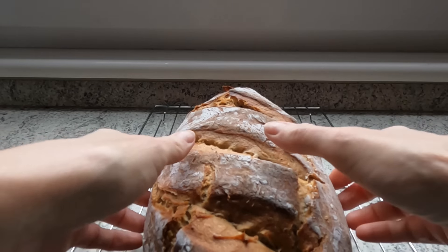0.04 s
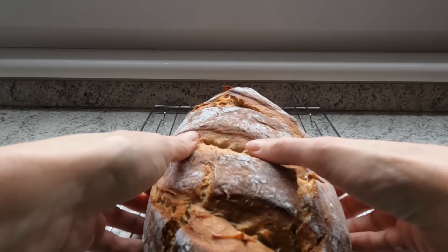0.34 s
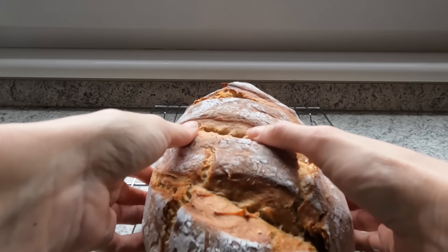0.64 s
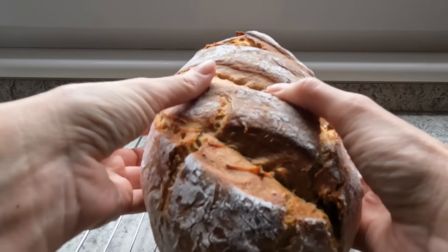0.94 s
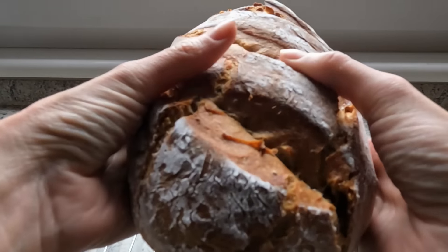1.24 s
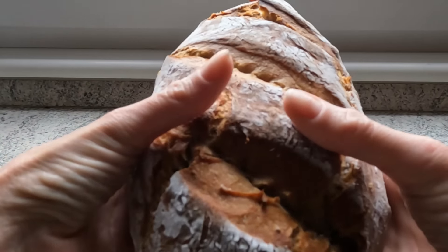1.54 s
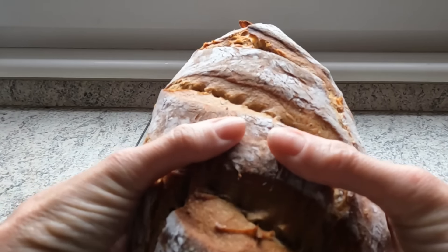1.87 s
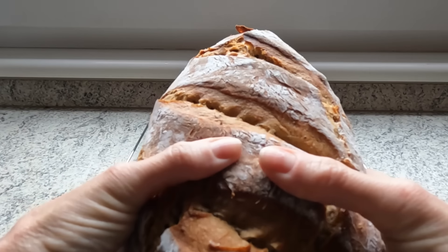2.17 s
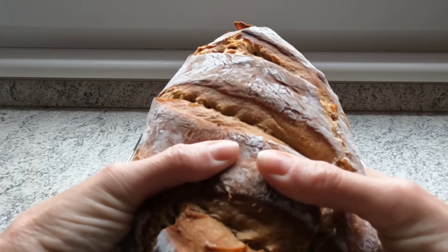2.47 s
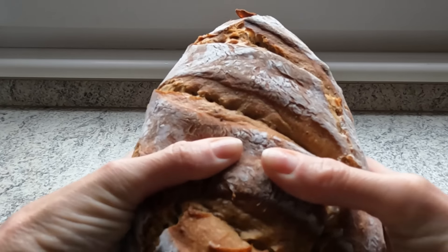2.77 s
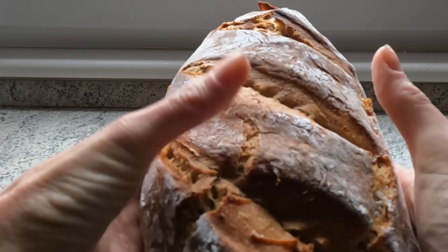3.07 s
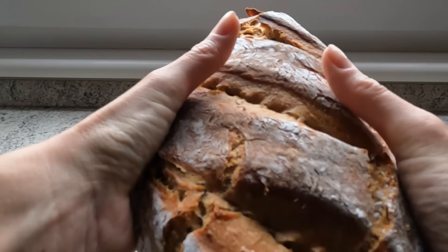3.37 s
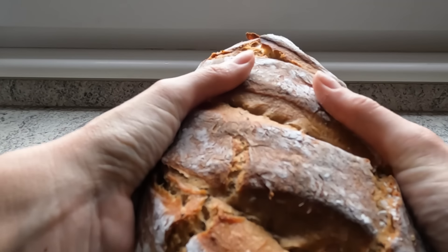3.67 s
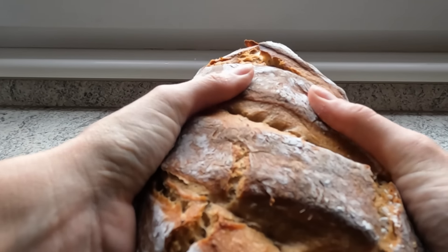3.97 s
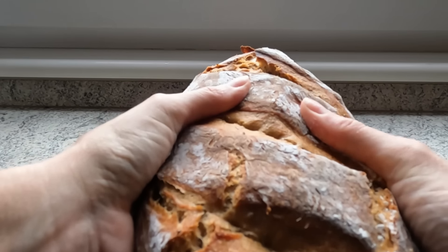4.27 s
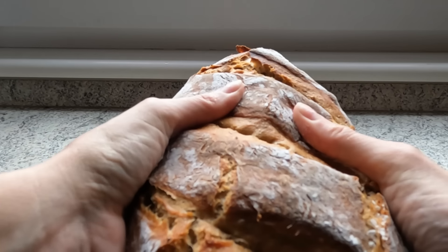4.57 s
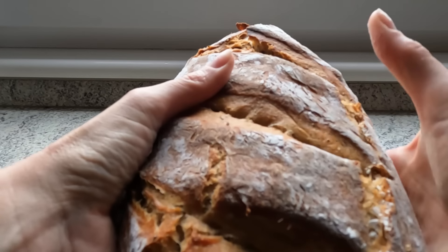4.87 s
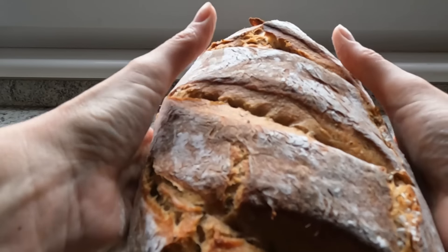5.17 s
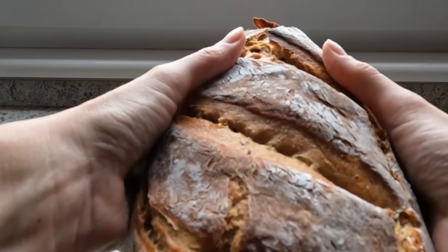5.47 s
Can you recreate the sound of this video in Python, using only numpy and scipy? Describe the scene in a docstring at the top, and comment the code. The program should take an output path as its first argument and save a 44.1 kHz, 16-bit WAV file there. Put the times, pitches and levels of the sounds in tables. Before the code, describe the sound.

Dry hands slide over a loaf of bread and lift it from a wire rack, which pings as the crust scrapes and the loaf thuds softly. Two squeezes follow, each breaking the crust into sharp clicks and fine crumbling, the first one longer. Between them comes a dull knock with a low rumble from the microphone stand. Everything is very near, in a small kitchen that hums quietly.

```python
"""The crust of a loaf snaps and crumbles as two hands squeeze it twice, close by in a small kitchen.
Each flake breaks with a click and splinters briefly; harder pressure sheds more and larger crumbs.
First the loaf is lifted off a wire cooling rack: the wires ping, the crust scrapes and judders.
Palms slide over the floury crust and the loaf thumps softly. Behind it, bumps set a camera stand
swaying with a low rumble, and the room hums quietly."""
import sys
import numpy as np
from scipy import signal
from scipy.fft import rfft, irfft
from scipy.io import wavfile

SR = 44100
rng = np.random.default_rng(int(sys.argv[2]) if len(sys.argv) > 2 else 0)


def wav_out(sig):
    """Save sig, one row per channel (or a flat mono array), as 16-bit PCM at SR to the path in sys.argv[1]."""
    wavfile.write(sys.argv[1], SR, np.round(np.clip(np.atleast_2d(sig).T, -1, 1) * 32767).astype(np.int16))


N = 243431
TIME = np.arange(N) / SR


def undb(db):
    """Decibels to gain."""
    return 10 ** (np.asarray(db) / 20)


def unit(x):
    """Scale to rms 1."""
    return x / np.sqrt(np.mean(x ** 2) + 1e-18)


def add(out, start_s, x):
    """Mix x into out from start_s on."""
    i = max(int(start_s * SR), 0)
    out[..., i:i + x.shape[-1]] += x[..., :max(N - i, 0)]


def place(x, pan_db):
    """Mono to stereo, left pan_db above right."""
    return x * undb(np.array([[pan_db], [-pan_db]]) / 2)


def colour(x, points, size=4096):
    """Minimum-phase filter through (freq_hz, gain_db) points, falling away outside them."""
    hz, db = np.transpose(points)
    log_hz = np.log(np.arange(size // 2 + 1) * SR / size + 1)
    outside = np.maximum(np.log(hz[0]) - log_hz, 0) + np.maximum(log_hz - np.log(hz[-1]), 0)
    gain_db = np.interp(log_hz, np.log(hz), db) - 20 * outside
    cepstrum = irfft(np.log(undb(gain_db)))
    cepstrum[1:size // 2] *= 2
    cepstrum[size // 2 + 1:] = 0
    response = irfft(np.exp(rfft(cepstrum)))[:size // 2]
    return signal.fftconvolve(x, response)[:len(x)]


def lowpass(x, hz):
    """Two-pole low-pass."""
    return signal.sosfilt(signal.butter(2, hz, fs=SR, output="sos"), x)


def resonate(x, hz, q):
    """Two-pole band-pass, q at least 0.2."""
    w = 2 * np.pi * min(hz / SR, .45)
    a = np.sin(w) / (2 * max(q, .2))
    return signal.lfilter([a, 0, -a], [1 + a, -2 * np.cos(w), 1 - a], x)


def grains(n, rate_hz, spread_db):
    """Sparse impulses of random sign and size."""
    chance, size, sign = rng.random((n, 3)).T
    spread = np.minimum(-np.log(1 - size), 4)
    return (chance < rate_hz / SR) * undb(spread_db * spread) * np.sign(sign - .5)


def walk(rate_hz, size=N):
    """Random wander with a spread near 1."""
    steps = rng.standard_normal(4096)
    return np.interp(TIME[:size] * rate_hz, np.arange(len(steps)), steps)


def decay(t, t60_s):
    """Gain falling 60 dB in t60_s."""
    return np.exp(-np.log(1000) * t / t60_s)


def swells(events, release_s):
    """Joint gain of (start_s, length_s, build_s, level_db) events that rise, hold and die away."""
    power = np.full(N, 1e-12)
    for start_s, length_s, build_s, level_db in events:
        t = TIME[:int((length_s + 10 * release_s) * SR)]
        rise = 1 - np.exp(-t / build_s)
        fall = np.exp(-np.maximum(t - length_s, 0) / release_s)
        add(power, start_s, (undb(level_db) * rise * fall) ** 2)
    return np.sqrt(power)


# room air spectrum: freq_hz, gain_db
AIR_COLOUR = [(25, 4.5), (60, -15.5), (100, -14), (230, -4.5), (500, -19), (750, -32), (1200, -17.5),
              (1800, -33), (2300, -24.5), (3200, -44.5), (8000, -37), (15000, -58)]


def room_tone(air_db=-50.5, side_db=-11, hum_hz=230, hum_q=16, hum_db=-57, waver_db=3):
    """Quiet indoor air with a wavering hum."""
    mid, side = (unit(colour(rng.standard_normal(N), AIR_COLOUR)) for _ in range(2))
    air = mid + undb(side_db) * side * np.array([[1], [-1]])
    hum = unit(resonate(resonate(rng.standard_normal(N), hum_hz, hum_q), hum_hz, hum_q))
    return undb(air_db) * air + undb(hum_db + waver_db * walk(9)) * hum


def kitchen_echo(x, tail_db=-16, t60_s=0.23, build_s=0.0016, echo_db=-22, echo_s=0.0059):
    """Worktop and window throw back a quick echo; a short diffuse tail follows."""
    t = TIME[:SR // 2]
    out = []
    for side in x:
        tail = rng.standard_normal(len(t)) * decay(t, t60_s) * (1 - np.exp(-t / build_s))
        tail = colour(tail, [(100, -13), (250, -0.5), (1000, -0.5), (5000, -3.5), (14000, -9)])
        response = undb(tail_db) * tail / np.linalg.norm(tail)
        response[int(echo_s * SR)] += undb(echo_db)
        out.append(signal.fftconvolve(side, response)[:N])
    return np.array(out)


# bumps on the stand: start_s, level_db
STAND_BUMPS = [(2.76, -24), (3.05, -29), (3.33, -31), (3.768, -3.5), (4.1, -27), (4.44, -23.5), (4.92, -21),
               (5.27, -22.5)]


def stand_sway(sway_hz=14.5, hold_s=0.072, build_s=0.02, release_s=0.27, rest_db=-46.5,
               rumble_db=-42, reference_db=-21, rumble_exponent=0.41):
    """The bumped stand sways below hearing; its rumble grows more slowly than the swing."""
    swing = np.sin(2 * np.pi * np.cumsum(sway_hz * (1 + .1 * walk(10))) / SR)
    rumble_colour = [(15, -23), (30, 1), (60, -23), (110, -27.5), (250, -75)]
    rumble = colour(rng.standard_normal(N), rumble_colour, size=16384)
    sway = swells([(start_s, hold_s, build_s, db) for start_s, db in STAND_BUMPS], release_s)
    rumble_gain = undb(rumble_db) * (sway / undb(reference_db)) ** rumble_exponent
    return unit(swing) * np.hypot(sway, undb(rest_db)) + unit(rumble) * rumble_gain


# soft blows on loaf and stand: start_s, level_db, pitch_hz, t60_s
BLOWS = [(.18, -35, 187.6, 0.42), (.374, -30, 217, 0.15), (.93, -38, 130, 0.7), (0.96, -42.5, 68.4, 1),
         (1.086, -32, 207, 0.095), (1.193, -25.5, 112.5, 0.21), (1.245, -16.5, 178, 0.093),
         (1.262, -17.5, 119, 0.15), (1.295, -24, 229, 0.17), (1.318, -30.5, 65, 0.21),
         (1.404, -27, 116, 0.1), (3.182, -31, 376, 0.037), (3.205, -34.5, 70.4, 0.21),
         (3.218, -23, 172, 0.019), (3.711, -32.5, 212, 0.12), (3.773, -14, 56.7, 0.12),
         (3.796, -16.5, 59.4, 0.41), (3.796, -26, 100, 0.09), (4.262, -40, 228, 0.12),
         (4.452, -16.5, 194, 0.05), (4.454, -28, 50.3, 0.26), (4.454, -28.5, 116, 0.22)]


def thuds(attack_s=0.0013, roughness=0.52):
    """A blow rings one damped low resonance, roughened by the soft contact."""
    out, t = np.zeros(N), TIME[:SR // 2]
    for start_s, level_db, pitch_hz, t60_s in BLOWS:
        contact = unit(resonate(rng.standard_normal(len(t)), pitch_hz, q=0.97))
        ring = lowpass(np.sin(2 * np.pi * pitch_hz * t) + roughness * contact, 3 * pitch_hz)
        envelope = (1 - np.exp(-t / attack_s)) * decay(t, t60_s)
        add(out, start_s, undb(level_db) * ring * envelope)
    return place(out, pan_db=0)


# spectra of skin on crust, flour and the soft loaf: freq_hz, gain_db
SKIN_COLOUR = [(500, -10.5), (1000, -2), (1600, -4.5), (2400, -1), (3500, 0), (5000, -3), (6500, -5),
               (8000, -9), (10000, -24.5)]
DUST_COLOUR = [(5000, -3), (7000, -8.5), (8800, -8), (10300, -7), (12500, -16), (16000, -29)]
MURMUR_COLOUR = [(60, -10.5), (100, -39), (130, -8), (180, -4), (230, 3), (300, -14.5), (380, -6.5),
                 (450, -8.5), (600, -17.5), (900, -22)]
# palm slides: start_s, length_s, build_s, rasp_db, flour_rel_db, murmur_db, hollow_hz, hollow_rel_db
PALM_SLIDES = [(0.049, 0.1, 0.017, -44.5, -6, -42.5, 1270, -5.5),
               (0.166, 0.23, 0.011, -51.5, -8.5, -51.5, 1230, -5),
               (0.453, 0.19, 0.013, -65.5, -0.5, -69, 1280, 4),
               (0.638, 0.18, .013, -53.5, -6.5, -45.5, 1400, -6),
               (0.835, 0.25, 0.01, -51, -9.5, -49, 1800, -12),
               (1.044, 0.14, .01, -45, -9.5, -45, 2030, -11.5),
               (1.204, 0.31, .013, -48.5, -8.5, -43.5, 2170, -6),
               (1.519, 0.067, .013, -47, -3, -42, 2400, -1.5),
               (1.585, 0.079, 0.014, -50, -4.5, -42.5, 2260, -9.5),
               (1.973, 0.023, 0.014, -55.5, -8, -45, 2270, -19),
               (2.115, 0.16, .03, -54.5, -4, -44, 2300, -2),
               (2.273, 0.29, .013, -43, -3.5, -47.5, 2300, -2),
               (2.651, 0.04, 0.018, -38, -5, -42, 2200, -13),
               (2.874, 0.014, 0.01, -41, -7, -37.5, 2230, -6),
               (2.966, 0.053, .013, -53.5, -4, -43.5, 2250, 0),
               (3.066, 0.19, 0.014, -46, -6, -46, 2550, -4),
               (3.244, 0.15, 0.055, -45.5, -2.5, -56, 2680, -6),
               (3.398, 0.063, 0.018, -49, -4.5, -52, 2500, -8),
               (3.494, 0.16, 0.024, -53.5, -2, -48.5, 2300, -18),
               (3.78, 0.42, .013, -58.5, -5.5, -69, 2230, -3),
               (4.234, 0.09, 0.0085, -53.5, 3.5, -44.5, 2200, -20),
               (4.43, 0.036, .013, -40, -2.5, -38, 2210, -5),
               (4.625, 0.037, .006, -46, -4, -44.5, 2200, -3),
               (4.833, 0.096, .013, -44, -8.5, -49.5, 2420, -10),
               (4.95, 0.12, 0.028, -45, -4.5, -60, 2900, -3),
               (5.051, 0.048, 0.021, -39.5, -7, -43.5, 3130, -9),
               (5.21, 0.13, 0.031, -48, -7, -54, 2450, -4.5),
               (5.34, 0.098, 0.029, -43, -6.5, -48, 2190, -0.5)]


def palms(rate_hz=5000, spread_db=4, flicker_db=2.5, apart_db=4, creep_db=-11, rasp_trim_db=1,
          murmur_trim_db=-2, murmur_build_s=0.017, murmur_rest_db=-53, hollow_half_width_hz=260):
    """Each palm rasps over crust and flour; the hollow under it rings and the soft loaf murmurs."""
    (start_s, length_s, build_s, rasp_db,
     flour_rel_db, murmur_db, hollow_hz, hollow_rel_db) = np.transpose(PALM_SLIDES)

    def strokes(level_db):
        """Gain of the slides, each followed by a faint creep of the hand."""
        rows = list(zip(start_s, length_s, build_s, level_db))
        return np.hypot(swells(rows, release_s=0.021), undb(creep_db) * swells(rows, release_s=0.13))

    rasp_gain = strokes(rasp_db) * undb(rasp_trim_db)
    flour_gain = strokes(rasp_db + flour_rel_db)
    pushes = [(s, held_s, murmur_build_s, db) for s, held_s, db in zip(start_s, length_s, murmur_db)]
    murmur_gain = np.hypot(swells(pushes, release_s=0.02), undb(murmur_rest_db)) * undb(murmur_trim_db)
    middle_s = start_s + length_s / 2  # the palm changes shape gradually between slides
    centre_hz = np.interp(TIME, middle_s, hollow_hz) * (1 + .04 * walk(25))
    carrier = np.exp(2j * np.pi * np.cumsum(centre_hz) / SR)
    hollow_gain = undb(np.interp(TIME, middle_s, hollow_rel_db))
    out = 0
    for pan_db in (apart_db, -apart_db):
        grip = undb(flicker_db * walk(90))
        hollow = unit(np.real(carrier * lowpass(rng.standard_normal(N) / carrier, hollow_half_width_hz)))
        rasp = unit(colour(grains(N, rate_hz, spread_db), SKIN_COLOUR))
        skin = (rasp + hollow_gain * hollow) * rasp_gain
        flour = unit(colour(grains(N, rate_hz, spread_db), DUST_COLOUR)) * flour_gain
        murmur = unit(colour(rng.standard_normal(N), MURMUR_COLOUR)) * murmur_gain
        out += place((skin + flour) * grip, pan_db) + place(murmur, pan_db / 2 - 4.5)
    return out / np.sqrt(2)


# wire rack modes: pitch_hz, level_db, t60_s
WIRE_MODES = [(379.5, -8, 0.3), (442, -5.5, 0.27), (1075, -8, 0.22), (1170, -16, 0.3), (1970, -15, 0.087),
              (3520, -4, 0.075), (3850, 0, 0.08), (3973, 2.5, 0.13), (4370, -8, 0.11), (5480, -4, 0.075),
              (5860, -5, 0.045), (6300, -11, 0.074), (6520, -15, .07), (6850, -11, 0.087),
              (7920, -3, 0.064)]


def rack_drag(start_s=0.757, length_s=0.24, build_s=0.17, level_db=-42, soft_hz=900, q=16):
    """Soft friction of the dragged loaf keeps the low modes of the wires singing."""
    rub = lowpass(grains(N, rate_hz=3000, spread_db=2), soft_hz)
    wires = unit(sum(undb(db) * resonate(rub, hz, q) for hz, db, _ in WIRE_MODES))
    return place(wires * swells([(start_s, length_s, build_s, level_db)], release_s=0.053), pan_db=-1)


# spectrum the crust radiates: freq_hz, gain_db
CRUST_RADIATION = [(200, 6.5), (500, 9), (1000, 3), (3000, -1), (6000, -2.5), (8500, -5), (10300, -4.5),
                   (13000, -10.5), (16000, -19)]
# wires springing free: start_s, level_db, ring_rel_db
WIRE_PINGS = [(0.7604, -27, -4), (0.8665, -22, 0), (0.9944, -18, -3.5), (1.0437, -20.5, -10),
              (1.243, -32, -6)]


def rack_pings(tick_db=-1, tick_s=0.0015, tick_hz=6000, rattle_depth=1.15, rattle_hz=260,
               detune=0.0216, neighbour_db=-4):
    """A wire ticks off the crust and rings with two unequal neighbours, chattering on the worktop."""
    out, t = np.zeros(N), TIME[:SR // 2]

    def sine(hz):
        """One mode at a random phase."""
        return np.sin(2 * np.pi * (hz * t + rng.random()))

    for start_s, level_db, ring_rel_db in WIRE_PINGS:
        ring = 0
        for pitch_hz, mode_db, t60_s in WIRE_MODES:
            chatter = 1 + rattle_depth * walk(rattle_hz, size=len(t))
            wire = sine(pitch_hz)
            neighbours = sum(sine(pitch_hz * (1 + detune * rng.standard_normal())) for _ in range(2))
            ring += undb(mode_db) * (wire + undb(neighbour_db) * neighbours) * chatter * decay(t, t60_s)
        tick = resonate(resonate(rng.standard_normal(len(t)), tick_hz, q=1), tick_hz, q=1)
        tick = colour(tick, CRUST_RADIATION) * np.exp(-t / tick_s)
        ping = undb(ring_rel_db) * ring / np.abs(ring).max() + undb(tick_db) * tick / np.abs(tick).max()
        add(out, start_s, undb(level_db) * ping)
    return place(out, pan_db=-0.19)


# spectrum of one slip: freq_hz, gain_db
SLIP_COLOUR = [(500, -11), (900, -18), (1200, 2), (1500, -11), (2600, 6), (3100, 1), (3900, -2),
               (4600, -28), (5400, -16), (6100, -9), (7500, -11), (9000, -33)]


def crust_judder(start_s=1.2878, slip_hz=243, count=6, jitter=.05, level_db=-13, swell_db=5,
                 grit_db=-20, grit_s=0.0023):
    """As the hands take the weight, the crust sticks and slips in quick, almost even succession."""
    out, t = np.zeros(N), TIME[:1024]
    for k in range(count):
        slip = undb(grit_db) * rng.standard_normal(len(t)) * np.exp(-t / grit_s)
        slip[0] = 1
        slip = colour(slip, SLIP_COLOUR, size=512)
        peak_db = level_db + swell_db * (np.sin(np.pi * (k + .5) / count) - 1)
        delay_s = (k + jitter * rng.standard_normal()) / slip_hz
        add(out, start_s + delay_s, undb(peak_db) * slip / np.abs(slip).max())
    return place(out, pan_db=-1)


# crust dragging over wire or skin: start_s, length_s, level_db, centre_hz, q
CRUST_SCRAPES = [(0.068, 0.008, -27.5, 2900, 0.51), (0.101, 0.011, -29, 1140, 0.3),
                 (0.117, 0.026, -25.5, 3200, 1.3), (0.127, 0.037, -25.5, 1290, 1.8),
                 (0.121, 0.03, -29, 644, 1.7), (0.654, 0.0042, -34, 4000, 1),
                 (0.658, 0.0052, -41, 2000, 3.9), (0.688, 0.04, -39, 1340, 2.9),
                 (1.054, 0.068, -40.5, 2800, 0.85), (1.286, 0.029, -24.5, 2570, 4.1),
                 (1.239, 0.024, -33, 620, 3.2), (1.28, 0.047, -26.5, 720, 1.5),
                 (1.312, 0.023, -31.5, 1900, 0.51), (1.534, 0.038, -35.5, 5140, 0.97),
                 (2.678, 0.029, -41, 680, 2.4), (3.207, 0.022, -34.5, 2420, 0.17),
                 (3.32, 0.085, -43, 5500, 4.2), (3.561, 0.011, -40, 5850, 1.5),
                 (3.65, 0.0073, -40, 5900, 2.8), (3.793, 0.056, -34.5, 755, 0.75),
                 (4.311, 0.058, -37.5, 2440, 0.6), (4.449, 0.05, -37, 895, 0.31),
                 (4.627, 0.005, -31, 2380, 0.59), (4.632, 0.013, -34, 2200, 4),
                 (4.847, 0.07, -47.5, 4900, 0.47)]


def crust_scrapes(rate_hz=7000, spread_db=1.5):
    """Short runs of stick and slip over the rough crust."""
    out, t = np.zeros(N), TIME[:4096]
    for start_s, length_s, level_db, centre_hz, q in CRUST_SCRAPES:
        slips = resonate(grains(len(t), rate_hz, spread_db), centre_hz, q)
        scrape = unit(colour(slips, CRUST_RADIATION, size=512))
        envelope = np.interp(t / length_s, [0, 0.23, 1, 1.5], [0.092, 0.89, 0.35, 0.073])
        add(out, start_s, undb(level_db) * scrape * envelope)
    return place(out, pan_db=-1)


# hands pressing the crust: start_s, length_s, level_db, unused
PRESSES = [(0.86, 0.75, -53, -68), (2.055, 0.19, -45.5, -60), (2.215, 0.38, -39.5, -48.5),
           (2.63, 0.17, -42.5, -54), (2.86, 0.24, -48.5, -65), (3.283, 0.38, -57, -57),
           (3.899, 0.57, -53, -65), (4.276, 0.39, -47, -56), (4.903, 0.38, -61, -70)]


def crust_crumbling(flake_hz=(920, 10500), q=1.7, rate_hz=130, spread_db=4.5, full_pressure_db=-36,
                    build_s=0.035, release_s=0.065, tilt_db_per_octave=0.5, pan_db=-1, scatter_db=2):
    """Tiny flakes of eight sizes give way; harder pressure makes them more frequent and larger."""
    crush = swells([(start_s, length_s, build_s, db) for start_s, length_s, db, _ in PRESSES], release_s)
    pressure = (crush / undb(full_pressure_db)) ** .25
    flakes = 0
    for pitch_hz in np.geomspace(*flake_hz, 8):
        breaks = grains(N, rate_hz, spread_db) * (rng.random(N) < pressure)
        gain = undb(tilt_db_per_octave * np.log2(pitch_hz / flake_hz[0]))
        flakes += gain * place(resonate(breaks, pitch_hz, q), pan_db + scatter_db * rng.standard_normal())
    flakes = np.array([colour(side, CRUST_RADIATION) for side in flakes])
    density = pressure / np.mean(pressure)
    return unit(flakes) / np.sqrt(density) * crush


# loudest snaps of the crust: start_s, level_db, pitch_hz, q, splinter_rel_db
CRUST_SNAPS = [(0.544, -46, 3200.0, 0.68, -3.0), (0.6606, -36, 1900.0, 2.2, -4),
               (0.7589, -25.5, 1980, 0.41, -8), (0.7711, -31, 3600.0, 1.4, 4),
               (0.9538, -43, 3000.0, 0.7, 0), (1.0437, -27.5, 2290, 0.32, 4), (1.0472, -27, 2180, 0.33, -1),
               (1.0763, -41, 3000.0, 0.7, -4.0), (1.2434, -37, 1540.0, 0.2, 5), (1.2431, -30, 6940, 4.9, 1),
               (1.2609, -32, 3000.0, 2, 0), (1.2813, -26.5, 2600.0, 3, -13), (1.5352, -31.5, 4020, 1.6, 4),
               (2.0338, -44, 3480.0, 0.25, -12), (2.065, -41, 2090.0, 1.0, 0),
               (2.0963, -41.5, 3340, 1.1, -7), (2.1253, -35, 6040, 0.23, -5),
               (2.1255, -27.5, 2280, 11, -14), (2.1333, -31, 1370, 1.1, -7),
               (2.1971, -30.5, 2520.0, 0.36, -5), (2.2242, -22.0, 2970, 0.94, -4.0),
               (2.2329, -27.5, 2890.0, 1.4, 3.0), (2.2414, -19.5, 4400.0, 0.17, -12),
               (2.251, -29, 2520.0, 1.4, -6.0), (2.2887, -30, 3170.0, 1, -3),
               (2.2951, -37, 3170.0, 0.35, -15.0), (2.3074, -29, 2640.0, 0.79, -7),
               (2.3155, -24.5, 3440, 1.1, -9), (2.3225, -18, 2800.0, 2.6, 1),
               (2.3315, -28.5, 2640.0, 1.3, 0), (2.361, -27.5, 1910.0, 0.67, -10.0),
               (2.3709, -28, 2300.0, 1.1, -2), (2.3858, -29, 3480.0, 0.25, -2.0),
               (2.3908, -28, 3030.0, 0.25, -8), (2.405, -29.5, 3170.0, 0.5, -5),
               (2.4144, -19, 2660, 0.37, 3), (2.4228, -19.5, 3820.0, 0.2, -2),
               (2.4521, -22, 4590.0, 0.27, -2), (2.477, -20.5, 2410.0, 0.17, 2),
               (2.4912, -20.5, 4030, 0.76, 2), (2.5046, -19, 3700, 0.17, 2), (2.539, -30, 2760.0, 0.7, 0),
               (2.547, -22.5, 3260, 0.25, -2), (2.5661, -19, 2400.0, 0.4, -4),
               (2.5674, -16.5, 4330, 0.68, -7), (2.5854, -37, 4030, 0.5, -4),
               (2.6147, -33, 2520.0, 0.25, -9), (2.636, -34.5, 3480.0, 0.21, -3),
               (2.6567, -27.5, 4000.0, 0.2, -5), (2.6755, -18, 1870, 1.1, -3.5),
               (2.6873, -26.5, 2760.0, 0.5, 6), (2.7085, -33, 2580, 1.4, -6),
               (2.7207, -25, 4190.0, 0.5, -15), (2.728, -33, 3320.0, 2.0, -4.0),
               (2.7448, -19.5, 4930, 1, -16), (2.754, -29, 4000.0, 0.5, 3), (2.7967, -34, 1660.0, 1.4, -9),
               (2.8025, -33, 2890.0, 1.4, -2.0), (2.8219, -29.5, 2890.0, 1.0, -4),
               (2.843, -26, 2400, 4.2, -2), (2.9325, -26.5, 2360, 0.25, 6), (3.0123, -31.5, 5100, 0.31, -3),
               (3.0347, -29, 1990, 0.94, 5), (3.0656, -37.0, 3160, 0.6, -4), (3.082, -36.5, 3180, 0.75, -2),
               (3.1075, -36, 1650, 1.2, 0), (3.1179, -34.5, 2530, 1.8, 6), (3.138, -33.5, 2590, 1.3, -5),
               (3.219, -34, 1310, 0.5, -6), (3.2235, -27, 3230, 0.56, -8.0), (3.619, -44, 4000.0, 0.65, -2),
               (3.711, -30.5, 1020, 3, -9), (3.795, -17.5, 1310, 1.6, -10), (3.9578, -33, 2880, 0.87, -7.5),
               (4.023, -26, 2690, 0.87, -7), (4.0442, -29.5, 3480.0, 2.5, -9),
               (4.082, -40.5, 2300, 1.2, -4), (4.1315, -41.5, 4500, 0.87, -4),
               (4.1948, -42, 2600, 0.25, -6), (4.223, -30.5, 2580, 0.38, -2),
               (4.2615, -14.5, 3320.0, 1.04, -13.0), (4.305, -20, 3000, 0.51, -10),
               (4.3164, -26.5, 1910.0, 0.46, 4), (4.3275, -31, 1900, 0.4, 5),
               (4.3328, -32, 2300.0, 0.39, -6.0), (4.372, -35, 4190.0, 0.25, -5),
               (4.4211, -27.5, 3060, 2, -15.0), (4.4409, -34, 3820.0, 0.5, -5),
               (4.4457, -23.5, 2210, 0.64, 1), (4.4522, -21.5, 1540, 0.46, -5),
               (4.4642, -27, 2760.0, 0.18, -7), (4.4866, -30, 3480.0, 0.55, -4),
               (4.5581, -37, 3030.0, 0.54, -2), (4.577, -28.5, 3650.0, 0.55, -13),
               (4.5813, -36, 2300.0, 0.23, 0.0), (4.6267, -19.5, 4250, 1.4, -6),
               (4.6268, -23, 1900, 0.88, -4), (4.6547, -32, 2420, 0.46, 6),
               (4.6863, -33.5, 3030.0, 0.67, -2), (4.6886, -36.5, 3800, 0.5, -6),
               (4.7325, -43.5, 2080, 0.55, -3), (4.7729, -49, 7000.0, 0.7, -8.0),
               (4.9104, -39, 2510, 1.7, -5), (4.9434, -41, 3000, 0.9, -5.5),
               (5.219, -34.5, 2760.0, 1.3, -12)]


def crust_snaps(splinter_s=0.0018, splinter_delay_s=0.0004, click_db=-24, shard_db=-5, shard_q=6.6,
                shard_octaves=(-0.72, 1), pan_db=-1.2, scatter_db=3):
    """A flake snaps with one click; the ragged break splinters on and frees a shard of another pitch."""
    out, t = np.zeros((2, N)), TIME[:1024]
    for start_s, level_db, pitch_hz, q, splinter_rel_db in CRUST_SNAPS:
        splinters = grains(len(t), rate_hz=5000, spread_db=-0.5)
        splinters *= np.exp(-t / splinter_s) * (t > splinter_delay_s)
        force = undb(splinter_rel_db) * splinters / np.sqrt(np.sum(splinters ** 2) + 1e-18)
        force[0] = 1  # the click
        shard_hz = pitch_hz * 2 ** rng.uniform(*shard_octaves)
        shard = resonate(force, shard_hz, shard_q) * undb(splinter_rel_db + shard_db)
        flake = resonate(force, pitch_hz, q) + shard + undb(click_db) * force
        band_hz = [0.34 * pitch_hz, min(4.7 * pitch_hz, .48 * SR)]  # little radiates far from the pitch
        flake = signal.sosfilt(signal.butter(2, band_hz, "band", fs=SR, output="sos"), flake)
        snap = colour(flake, CRUST_RADIATION, size=512)
        snap /= np.sqrt(np.sum(snap ** 2) / (.003 * SR))  # energy of 3 ms at rms 1
        add(out, start_s, place(undb(level_db) * snap, pan_db + scatter_db * rng.standard_normal()))
    return out


def scene():
    """The handled loaf and its echo, over the swaying stand and the room tone."""
    crust = crust_snaps() + crust_crumbling() + crust_scrapes() + crust_judder()
    close = crust + palms() + thuds() + rack_pings() + rack_drag()
    return close + kitchen_echo(close) + stand_sway() + room_tone()


# phase of left port over right: freq_hz, lead_rad
LEFT_LEAD = [(0, 0), (3190, -0.64), (5250, -0.42), (8530, -0.89), (11700, 1), (15600, 1), (16200, 0.62)]
# treble of left port over right: freq_hz, gain_db
LEFT_TILT = [(4500, 0), (14000, 1)]
# microphone housing response: freq_hz, gain_db
HOUSING_COLOUR = [(10, 2), (550, 0), (700, -1), (830, -8.5), (1050, -0.5), (7000, 0), (8600, -3.5),
                  (10200, 0.5), (16000, -0.5)]


def record(dry, top_hz=15700):
    """Two microphone ports, the left phase-shifted and brighter; coloured, clipped and low-passed."""
    hz = np.arange(N // 2 + 1) * SR / N
    lead_rad = np.interp(hz, *np.transpose(LEFT_LEAD))
    tilt_db = np.interp(hz, *np.transpose(LEFT_TILT))
    left = irfft(rfft(dry[0]) * np.exp(1j * lead_rad) * undb(tilt_db / 2), N)
    right = irfft(rfft(dry[1]) * undb(-tilt_db / 2), N)
    ports = np.clip([colour(port, HOUSING_COLOUR) for port in (left, right)], -1, 1)
    return signal.sosfilt(signal.ellip(8, .2, 70, top_hz, fs=SR, output="sos"), ports)


dry = scene()
out = record(dry)
wav_out(out)
```